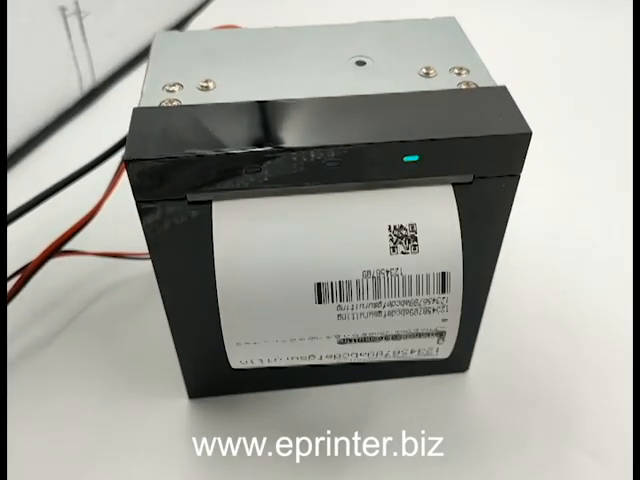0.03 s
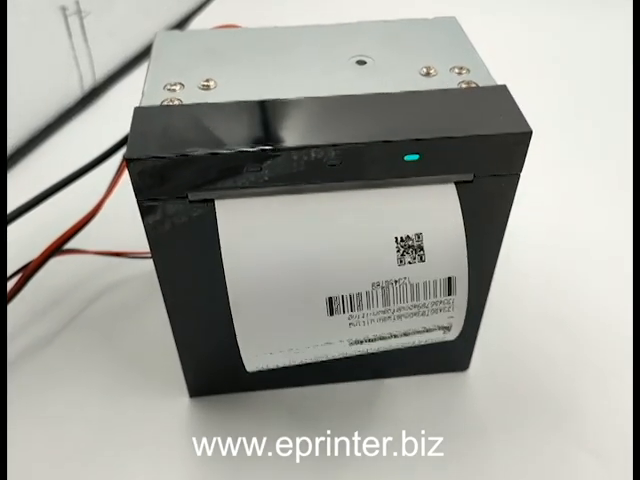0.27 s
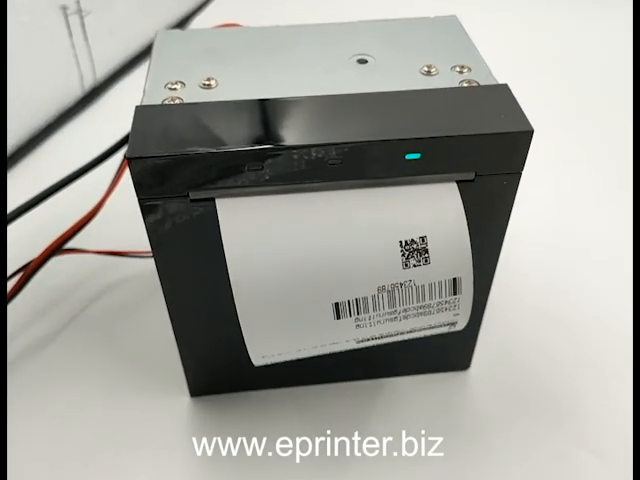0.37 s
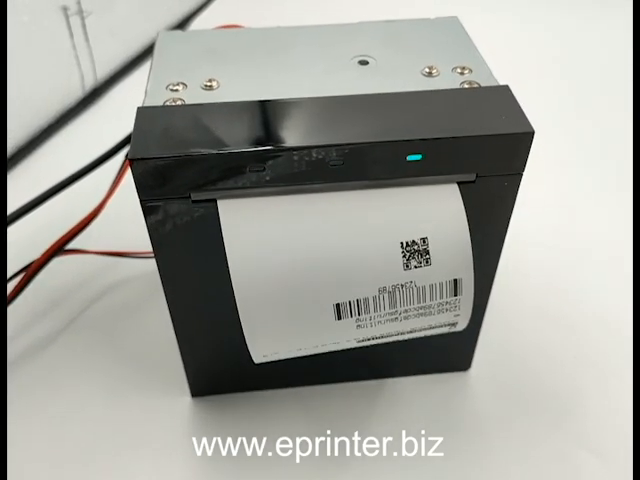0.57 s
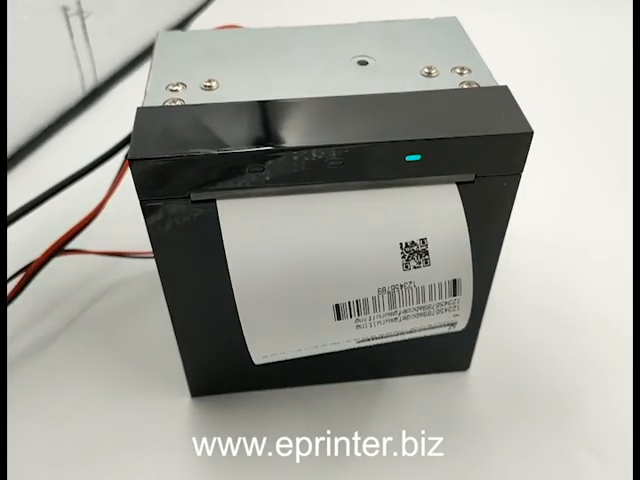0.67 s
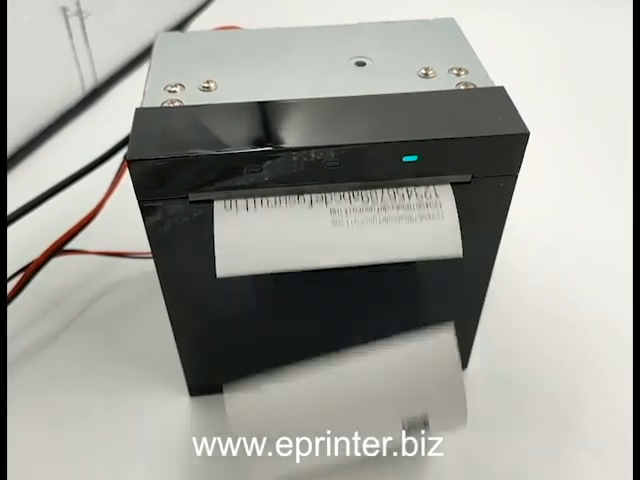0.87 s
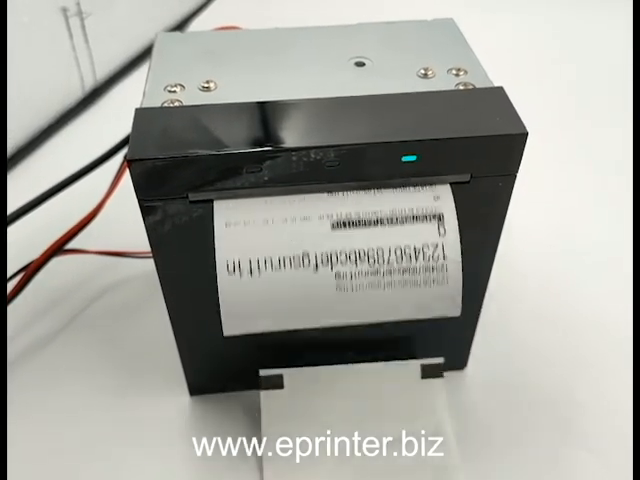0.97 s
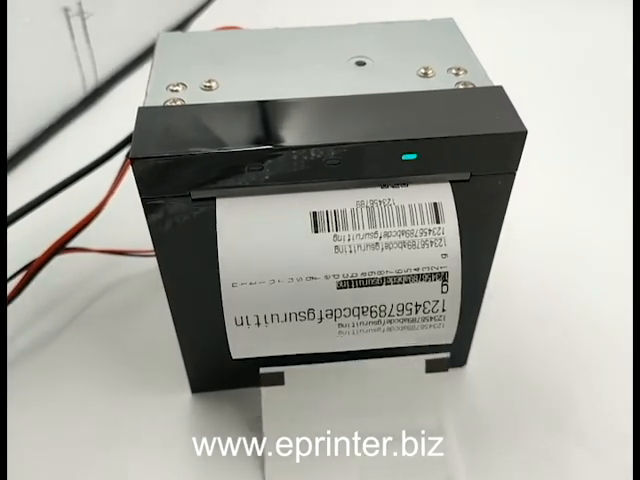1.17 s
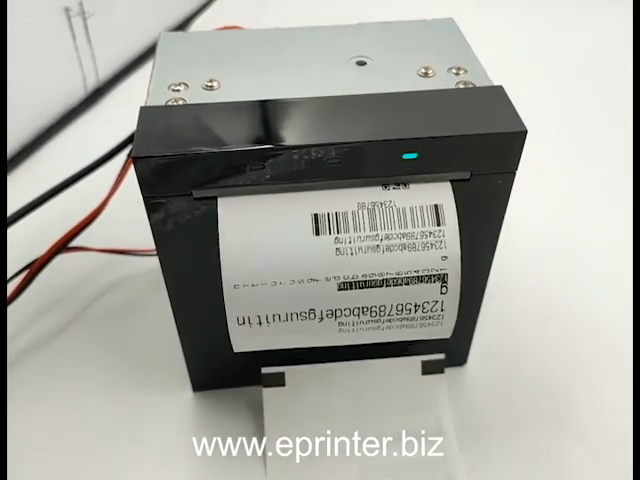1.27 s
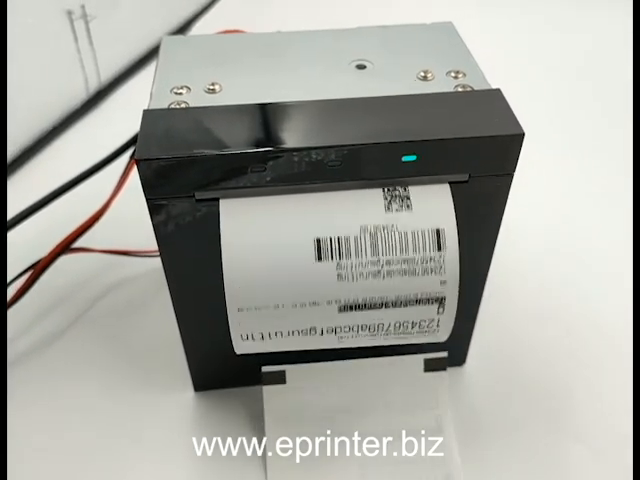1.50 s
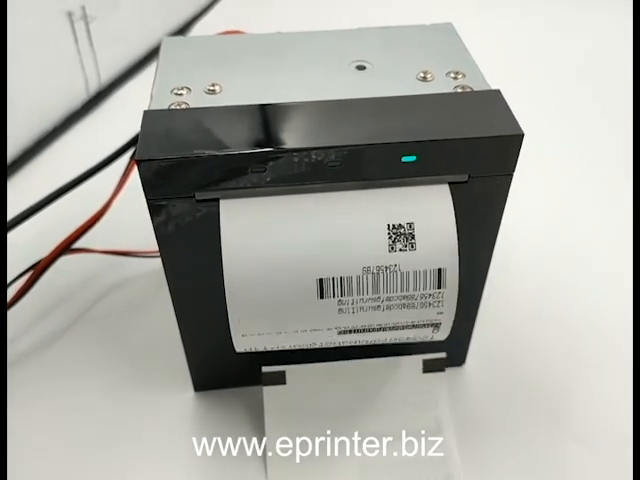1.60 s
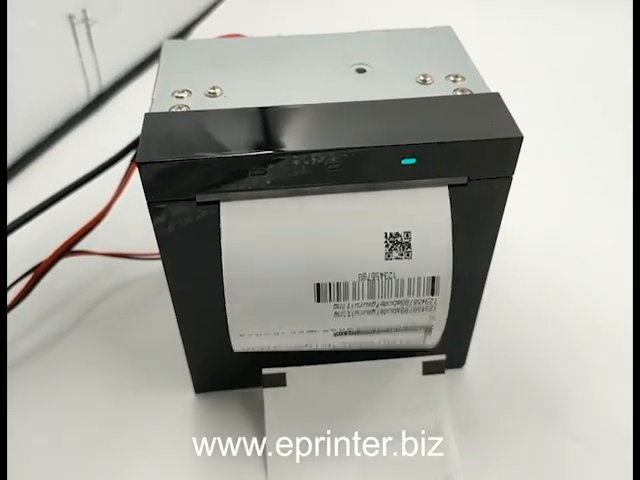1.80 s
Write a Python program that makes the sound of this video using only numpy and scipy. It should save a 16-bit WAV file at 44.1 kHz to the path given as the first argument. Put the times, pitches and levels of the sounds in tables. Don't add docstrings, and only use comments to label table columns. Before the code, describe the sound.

Thermal printer motor buzzes and paper hisses in bursts, ending with a hard metallic double clack

```python
import sys
import numpy as np
from scipy import signal
from scipy.fft import rfft, irfft, next_fast_len
from scipy.io import wavfile
from scipy.ndimage import uniform_filter1d, map_coordinates

SR = 44100
rng = np.random.default_rng(int(sys.argv[2]) if len(sys.argv) > 2 else 0)


def gain_from_decibels(decibels):
    exponent = np.asarray(decibels, float) / 20
    return 10 ** exponent


def transcribe(u):
    v = np.clip(np.atleast_2d(u).T, -1, 1)
    q = np.round(v * 32767).astype(np.int16)
    wavfile.write(sys.argv[1], SR, q)


N = 81585

# start_s, stop_s, top_speed (share of cruise), step_level_db
FEEDS = [
    (0.283, 0.778, 1, -36.5),
    (0.902, 1, .183, -50),
    (1.076, 1.282, 1, -41.5),
]


def unit(x):
    return x / np.sqrt(np.mean(x ** 2) + 1e-20)


def along(points, hz):
    f, v = np.transpose(points)
    return np.interp(np.log(hz + 1), np.log(f + 1), v)


def curves(rows, off_db=-150):
    s, *cols = np.transpose(rows)
    return [np.interp(np.arange(N) / SR, s, c, off_db, off_db) for c in cols]


def wobble(rate):
    knots = rng.standard_normal(int(N * rate / SR) + 4)
    return map_coordinates(knots, [np.arange(N) * rate / SR])


def filtered(x, response):
    m = next_fast_len(len(x) + SR // 2)
    return irfft(rfft(x, m) * response(np.fft.rfftfreq(m, 1 / SR)), m)[:len(x)]


def hiss(spectrum, grain_db):
    grain = grain_db * wobble(700) + grain_db * wobble(70.14) / 2
    noise = rng.standard_normal(N) * gain_from_decibels(grain)
    return unit(filtered(noise, lambda hz: gain_from_decibels(along(spectrum, hz))))


def background():
    # freq_hz, level_db per Hz
    air_spectrum = [(100, -0.5), (200, -8), (350, -13.5), (2000, -22.5), (8600, -37), (10000, -61),
                    (13000, -38), (15500, -35)]
    rumble_spectrum = [(8, 3), (22, 3), (70, -20.5), (125, -22), (300, -66)]
    air = gain_from_decibels(-55) * hiss(air_spectrum, grain_db=0.5)
    return air + gain_from_decibels(-50.5 + 1.5 * wobble(6.6)) * hiss(rumble_spectrum, grain_db=3.0)


def room(x):
    # freq_hz, t60_s
    room_decay = [(200, 0.8), (8500, 0.28), (14000, 0.31)]
    hz, t, z = signal.stft(rng.standard_normal(SR // 2), SR, nperseg=256)
    fade = gain_from_decibels(-60 * t / along(room_decay, hz)[:, None])
    tail = signal.istft(z * fade, SR, nperseg=256)[1]
    delayed = np.pad(x, (200, 0))
    return signal.fftconvolve(delayed, tail / np.linalg.norm(tail))[:N]


def chassis(x):
    # freq_hz, width_hz, level_db
    case_modes = [(342, 365, -8), (502, 186, -2), (655, 33, 9), (766, 87, 0.5), (1050, 56, 1.5),
                  (1500, 410, -11), (1908, 48, 0.5), (2244, 65, -7), (2530, 140, -8), (3130, 390, -14)]

    def response(f):
        return sum((-1) ** k * gain_from_decibels(db) * 1j * f * w / (c * c - f * f + 1j * f * w)
                   for k, (c, w, db) in enumerate(case_modes))
    return filtered(x, response)


def scrapes():
    # start_s, length_s, level_db, centre_hz, spread_octaves
    rubs = [(0.311, 0.1, -50, 4040, 0.52), (0.404, 0.028, -38.5, 4700, 0.49), (0.438, 0.02, -35, 3100, .25),
            (0.42, 0.057, -51, 182, 0.29), (1.017, 0.059, -58.5, 8000, 0.33),
            (1.174, 0.1, -39.5, 2510, 0.17), (1.299, 0.032, -52, 355, .3),
            (0.668, 0.099, -39.5, 2630, 0.24), (0.923, .03, -42.5, 3000, 0.48),
            (1.31, 0.063, -45.5, 1730, 0.84), (1.395, 0.042, -35.5, 2350, 0.17),
            (1.423, 0.027, -61, 470, 0.34), (1.464, 0.027, -38.5, 2470, 0.34), (1.53, 0.047, -41, 1500, .6),
            (1.555, 0.016, -39, 3230, 0.26), (1.58, 0.029, -32.5, 1870, 0.38),
            (1.583, 0.033, -42, 3700, 0.35), (1.592, 0.026, -41, 1080, 0.48),
            (1.63, .022, -52.5, 5930, 0.71)]
    grain_db, sag_oct = 2, 0.12
    out, t = np.zeros(N), np.arange(N) / SR
    for s, length, db, hz, spread in rubs:
        u = np.clip((t - s) / length, 0, 1)
        grains = rng.standard_normal(N) * gain_from_decibels(grain_db * wobble(500))

        def band(shift_oct):
            return unit(filtered(grains, lambda f: .5 ** ((np.log2((f + 1) / hz) + shift_oct) / spread) ** 2))
        early, late = band(-sag_oct / 2), band(sag_oct / 2)
        out += gain_from_decibels(db) * np.sin(np.pi * u) * ((1 - u) * early + u * late)
    return out


def burst(db, t60, hz, spread_oct):
    # freq_hz, level_db
    mic_colour = [(6000, 0), (8600, 7), (9300, 0), (10000, -16), (15000, -3)]
    snap_db, snap_t60_s, attack_cycles = 2, .003, 1.2
    t = np.arange(SR // 4) / SR

    def band(f):
        return gain_from_decibels(along(mic_colour, f)) * .5 ** ((np.log2((f + 1) / hz) / spread_oct) ** 2)
    noise = unit(filtered(rng.standard_normal(len(t)), band))
    shape = gain_from_decibels(-60 * t / t60) + gain_from_decibels(snap_db - 60 * t / snap_t60_s)
    return gain_from_decibels(db) * shape * (1 - np.exp(-t * hz / attack_cycles)) * noise


def paper_ticks():
    # start_s, level_db, t60_s, centre_hz, spread_octaves
    ticks = [(.002, -53, 0.18, 5400, 1.8), (0.073, -42.5, 0.039, 4300, 1), (0.115, -51, 0.03, 14100, 0.64),
             (0.115, -56.5, 0.15, 8600, 0.099), (1.07, -42, 0.022, 7500, 1),
             (1.305, -42.5, .05, 5940, 0.54), (1.345, -37.5, 0.06, 8900, 0.4),
             (1.551, -36, 0.042, 8700, 0.16), (1.557, -28.5, 0.037, 8800, 0.12),
             (1.313, -47, 0.036, 8000, 0.76), (1.346, -55, 0.1, 6400, .06), (1.609, -56, 0.018, 7000, 0.55),
             (1.669, -34.5, 0.0084, 4600, 0.31), (1.671, -40, 0.048, 3480, 1.3),
             (1.684, -45, 0.018, 7460, 0.54), (1.7, -49, 0.035, 8100, 0.83),
             (1.733, -35.5, 0.014, 8350, 0.5), (1.736, -45, 0.075, 5000, 1.4),
             (1.82, -54, 0.048, 7600, 0.21), (1.837, -53, 0.033, 6570, 0.81)]
    spray = np.zeros(N + SR)
    for s, db, t60, hz, spread_oct in ticks:
        spray[round(s * SR):][:SR // 4] += burst(db, t60, hz, spread_oct)
    return spray[:N]


def clacks():
    # start_s, level_db, t60_s, centre_hz, knock_db
    blows = [(.242, -42, 0.036, 3950, -32.5), (.436, -26.5, 0.07, 4330, -35),
             (.498, -29.5, 0.021, 8100, -58), (.865, -40, 0.1, 3000, -26), (0.903, -42, 0.067, 1370, -46),
             (1.102, -41, 0.38, 3500, -51), (1.45, -16.5, 0.022, 6500, -37),
             (1.454, -14, 0.048, 4040, -22.5), (1.464, -49, .07, 4000, -24.5),
             (1.491, -37, 0.039, 9050, -33), (1.496, -17, 0.045, 4560, -29),
             (1.503, -22, 0.085, 4700, -27.5), (1.513, -31, 0.033, 7000, -37),
             (.984, -36, 0.017, 3970, -44), (1.075, -49, 0.027, 1500, -33.5)]
    spray, knocks, t = np.zeros(N + SR), np.zeros(N + SR), np.arange(SR // 50) / SR
    for s, db, t60, hz, knock_db in blows:
        spray[round(s * SR):][:SR // 4] += burst(db, t60, hz, spread_oct=1.44)
        knock = np.exp(-t / .0001) + 0.57 * np.exp(-t / 0.0022) * rng.standard_normal(len(t))
        knocks[round(s * SR):][:len(t)] += gain_from_decibels(knock_db + 19.5) * knock
    return spray[:N] + chassis(knocks[:N])


def blade_ring():
    # freq_hz, level_db, t60_s
    steel_modes = [(1055, -9, 0.056), (1647, -10, 0.16), (1880, -20, 5.0), (2420, -8, 0.098),
                   (3780, -9, 0.05), (4500, -18, 0.093), (5200, -11, 0.06), (6900, -14, 0.042),
                   (8554, 9.5, 0.11)]
    # start_s, level_db
    strikes = [
        (1.448, -36),
        (1.454, -33),
        (1.497, -35.5),
        (1.504, -46),
    ]
    longest_t60_s = .06
    out, t = np.zeros(N + SR), np.arange(SR // 4) / SR
    for s, db in strikes:
        for hz, level, t60 in steel_modes:
            level_scatter, pitch_scatter = rng.standard_normal(2)
            decay = gain_from_decibels(db + level + 2.3 * level_scatter - 60 * t / min(t60, longest_t60_s))
            tone = np.sin(2 * np.pi * hz * (1 + .005 * pitch_scatter) * t)
            out[round(s * SR):][:len(t)] += decay * tone
    return out[:N]


def platen_slip():
    # time_s, level_db
    slip_swell = [(.2415, -36), (.244, -28), (.254, -21.5), (.265, -25.5), (.28, -26), (.292, -50),
                  (.31, -71)]
    # freq_hz, level_db per Hz
    slip_spectrum = [(400, -16), (1000, -10), (2000, -3), (4000, -8), (8200, 2.5), (9300, -3), (10200, -22),
                     (16000, -24)]
    return gain_from_decibels(curves(slip_swell)[0]) * hiss(slip_spectrum, grain_db=1.5)


def cutter_drive():
    # time_s, level_db
    cutting = [(1.322, -54), (1.343, -52), (1.346, -41.5), (1.381, -39.5), (1.386, -28.5), (1.405, -30.5),
               (1.428, -30), (1.434, -33.5), (1.45, -31.5)]
    returning = [(1.45, -27.5), (1.475, -39), (1.488, -36), (1.5, -27.5), (1.53, -35), (1.545, -41),
                 (1.575, -35.5), (1.62, -54), (1.85, -65)]
    # freq_hz, level_db per Hz
    blade_spectrum = [(200, -15), (450, 3.5), (1000, -0.5), (2200, 2), (5200, -2), (8600, 2.5),
                      (9900, -8.5), (16000, -18)]
    effort = gain_from_decibels(curves(cutting)[0]) + gain_from_decibels(curves(returning)[0])
    return effort * hiss(blade_spectrum, grain_db=1.3)


def running():
    t = np.arange(N) / SR
    return uniform_filter1d(1. * sum((t > start) & (t < stop) for start, stop, *_ in FEEDS), size=130)


def paper_feed():
    # time_s, drag_db, rattle_db (over the drag)
    drags = [
        [(.28, -44.5, 4), (.31, -37.5, 3.5), (.362, -51, 11.5), (.4, -40, -0.5), (.43, -37, -3.5),
         (.5, -37, -6.5), (.735, -34, -13.5), (.765, -39.5, 9), (.8, -71, -8)],
        [(.902, -51.5, 11.5), (.936, -36.5, 6), (.956, -43, 7), (.99, -44, 6), (1.015, -61, 7)],
        [(1.07, -55, -10), (1.08, -46, 5.5), (1.108, -38, 7.5), (1.128, -45.5, 9.5), (1.18, -36, -5.5),
         (1.246, -33.5, -9), (1.272, -40, 10.5), (1.292, -51, -7)],
    ]
    # freq_hz, level_db per Hz
    paper_spectrum = [(470, -38), (800, -3), (1050, -1), (1480, -7), (1810, 6.5), (2840, -6.5), (8550, 2),
                      (10400, -15), (16000, -15)]
    slide = hiss(paper_spectrum, grain_db=1.5)
    gears = unit(chassis(hiss([(100, 0), (5000, 0)], grain_db=3.0)))
    out, on = np.zeros(N), running()
    for rows in drags:
        drag_db, rattle_db = curves(rows)
        out += gain_from_decibels(drag_db) * (slide + on * gain_from_decibels(rattle_db) * gears)
    return out


def ringing():
    # start_s, freq_hz, level_db, t60_s, attack_s
    free_modes = [(.242, 624, -26, 0.013, 0.0023), (.308, 1914, -38.5, 0.057, 0.0033),
                  (.458, 1906, -37, 0.085, 0.0013), (0.449, 117.2, -47, 0.17, 0.019),
                  (.55, 106, -49.5, 0.11, 0.018), (.78, 655, -41.5, 0.09, 0.0017),
                  (1.178, 1056, -43, 0.042, .004), (.85, 28.4, -53, 0.35, 0.0097),
                  (.865, 777, -39, 0.022, 0.00078), (.868, 1078, -42.5, 0.045, 0.0028),
                  (.934, 660, -36, 0.017, 0.00091), (1.004, 655, -58, 0.051, 0.0041),
                  (1.187, 1916, -35.5, 0.083, 0.0045), (1.283, 662, -44.5, 0.11, 0.003)]
    out, t = np.zeros(N + SR), np.arange(SR // 2) / SR
    for s, hz, db, t60, attack in free_modes:
        shape = gain_from_decibels(db - 60 * (t / t60) ** 2) * (1 - np.exp(-t / attack))
        tone = np.sin(2 * np.pi * hz * t + 0.27 * wobble(103)[:len(t)])
        out[round(s * SR):][:len(t)] += 2 * shape * tone
    return out[:N] * gain_from_decibels(2.6 * wobble(79.16))


def rotor_swing(rate, turn, cruised):
    main = gain_from_decibels(-32 + 2.5 * wobble(119.0)) * np.exp(-((rate - 655) / 85) ** 4) * np.sin(turn)
    half_step = cruised * gain_from_decibels(-34.5) * np.exp(-((rate - 317) / 45) ** 2) * np.sin(2 * turn)
    slow = gain_from_decibels(-44) * np.exp(-((rate - 446) / 146) ** 2) * np.sin(turn)
    return main + half_step + slow


def cruise_song(t, turn, brake):
    cycle_levels = [-64, -59, -59.5, -47.5, -50, -52.5, -55.5]
    song = sum(gain_from_decibels(level + 4.1 * wobble(54.5)) * np.sin(k * turn / 4 + 0.48 * wobble(68.9))
               for k, level in enumerate(cycle_levels, start=1))
    song *= gain_from_decibels(6 * np.exp(-np.abs(brake - t) / 0.15))
    return song + gain_from_decibels(-52 + 1.8 * wobble(22.0)) * np.sin(2 * np.pi * 5600 * t + 0.2 * wobble(48))


def stepper():
    # time_s (after start), speed (share of cruise)
    speed_ramp = [(0, .115), (.03, .185), (.05, .275), (.062, .34), (.087, .44), (.105, .6), (.125, .93)]
    # multiple (of the creep rate), level_db
    creep_lines = [(1, -45), (2, -51), (3, -43.5), (4, -65)]
    cruise_hz, creep_hz, creep_s = 1752, 307.6, 0.033
    t, kicks, lines = np.arange(N) / SR, np.zeros(N), np.zeros(N)
    for start, stop, top, db in FEEDS:
        speed = np.minimum(np.interp(t - start, *np.transpose(speed_ramp), right=1), top)
        rate = cruise_hz * speed
        turn = 2 * np.pi * np.cumsum(rate) / SR
        cruised = top > speed_ramp[-2][1]
        brake = stop - creep_s * cruised
        on = uniform_filter1d(1. * ((t > start) & (t < brake)), size=90)
        creep = uniform_filter1d(1. * ((t >= brake) & (t < stop)), size=130)

        tilt = 0.15 + 4.5 * speed
        train = sum(k ** -tilt * np.cos(k * turn) * (k * rate < 4000) for k in range(2, 16))
        kicks += on * (1 - speed ** 2) * train * gain_from_decibels(db + 2 * wobble(140))

        moving = speed ** 4 * cruise_song(t, turn, brake) + rotor_swing(rate, turn, cruised)
        crawl = sum(gain_from_decibels(level + 1.9 * wobble(59.6)) * np.sin(2 * np.pi * k * creep_hz * (t - brake))
                    for k, level in creep_lines)
        lines += np.sqrt(2) * (on * moving + creep * crawl)
    return chassis(kicks) + lines


def scene():
    blows = paper_ticks() + clacks() + blade_ring()
    airborne = scrapes() + blows + platen_slip() + cutter_drive() + paper_feed()
    return (background() + gain_from_decibels(-16) * room(airborne) + airborne + ringing() + stepper())[None]


def top_cut(x):
    return signal.sosfilt(signal.butter(12, 16840, fs=SR, output="sos"), x)


def record(dry):
    clip_top, clip_hardness, top_hz = 0.36, 4, 15900
    x = dry[0] / (1 + np.abs(dry[0] / clip_top) ** clip_hardness) ** (1 / clip_hardness)
    mix = filtered(x, lambda hz: hz < top_hz)[None]
    return top_cut(mix)


dry = scene()
out = record(dry)
transcribe(out)
```